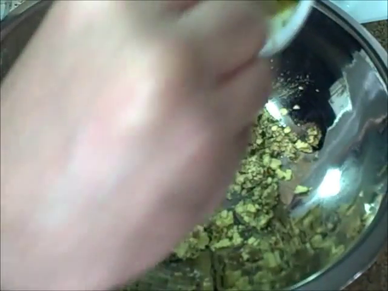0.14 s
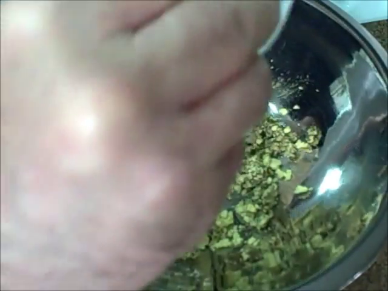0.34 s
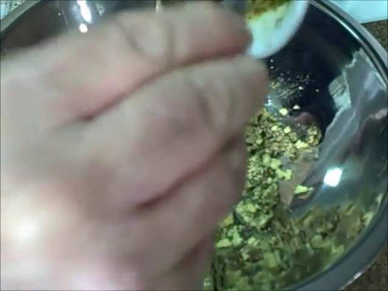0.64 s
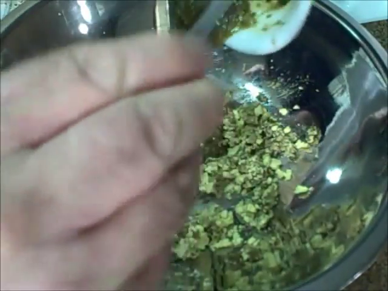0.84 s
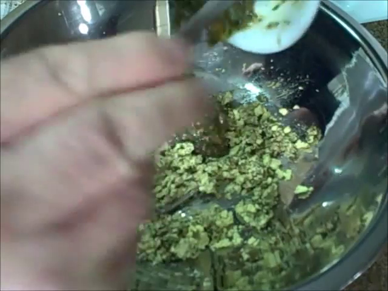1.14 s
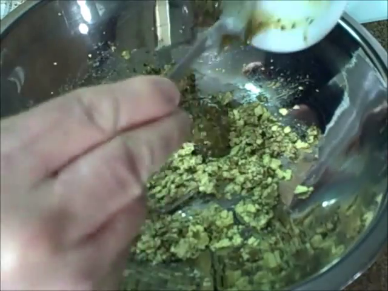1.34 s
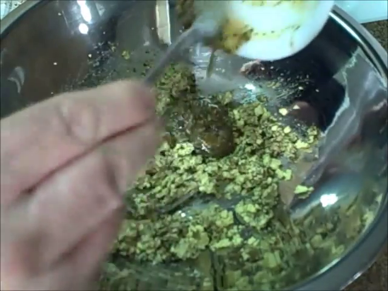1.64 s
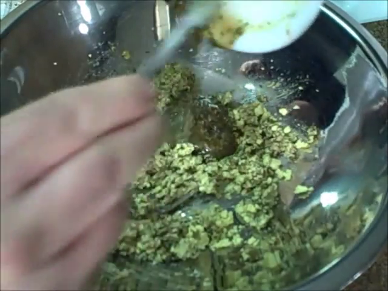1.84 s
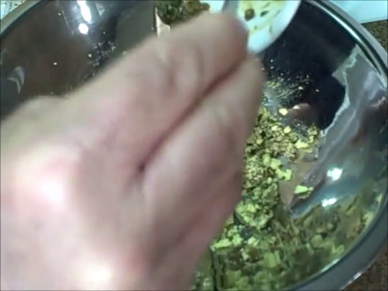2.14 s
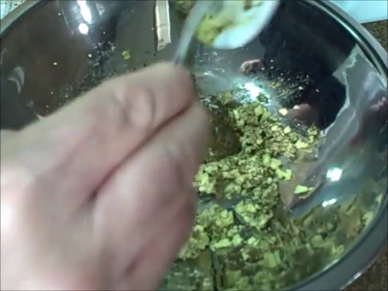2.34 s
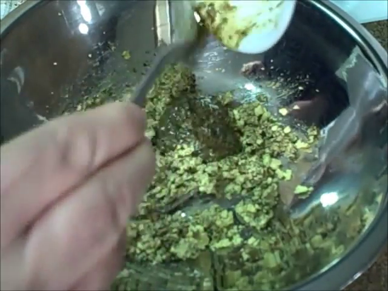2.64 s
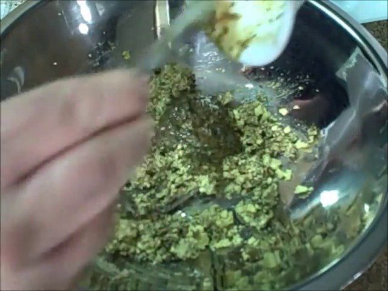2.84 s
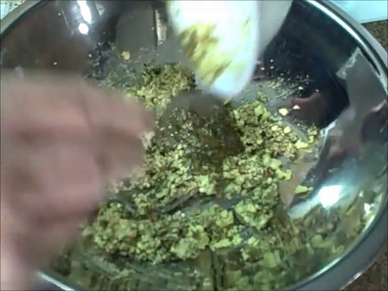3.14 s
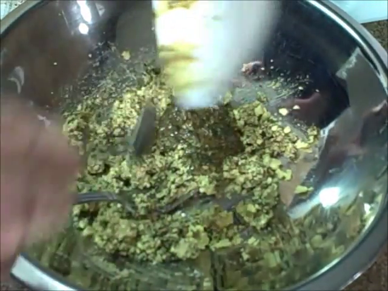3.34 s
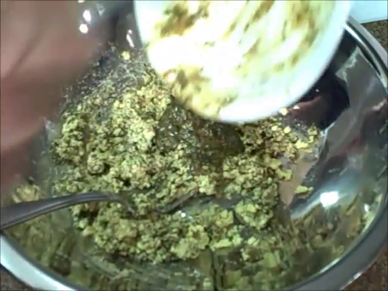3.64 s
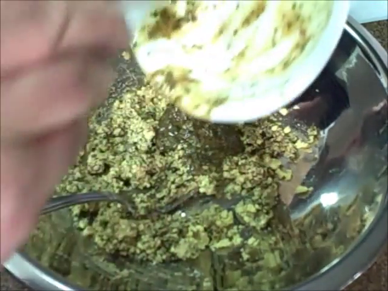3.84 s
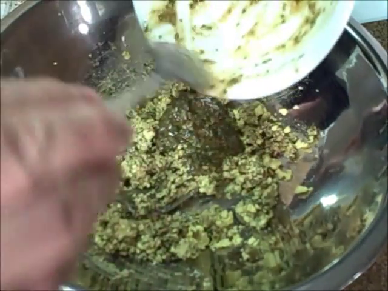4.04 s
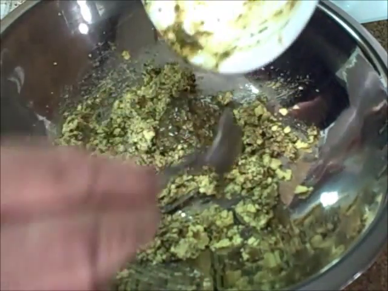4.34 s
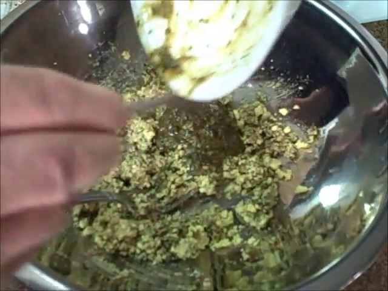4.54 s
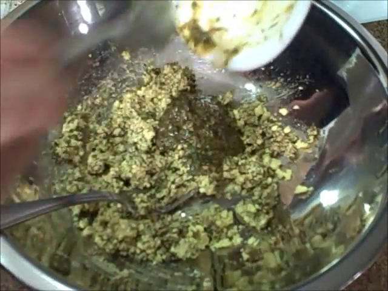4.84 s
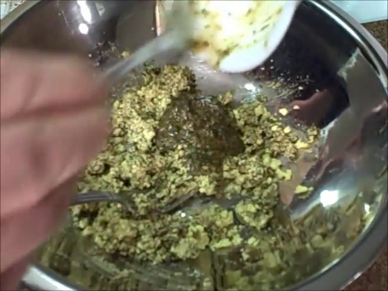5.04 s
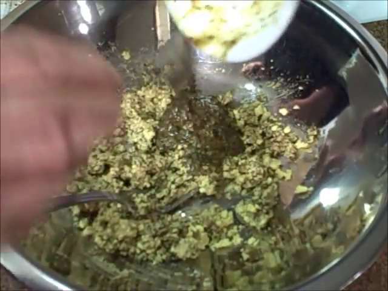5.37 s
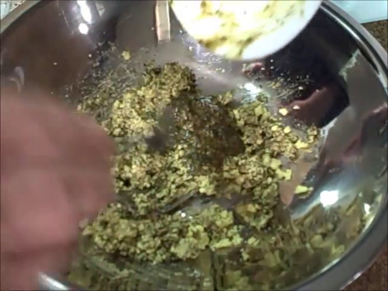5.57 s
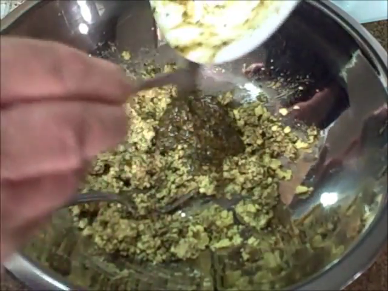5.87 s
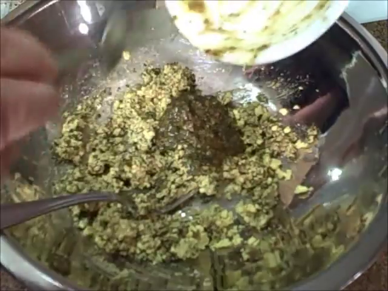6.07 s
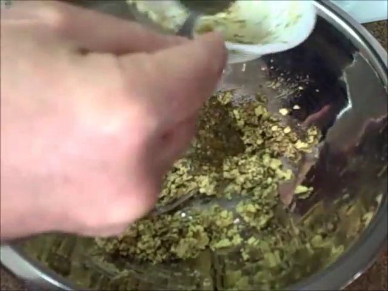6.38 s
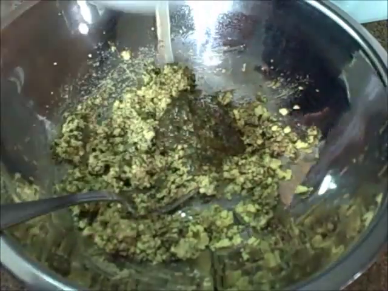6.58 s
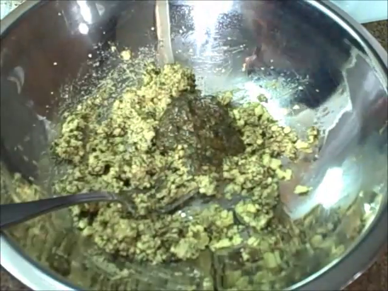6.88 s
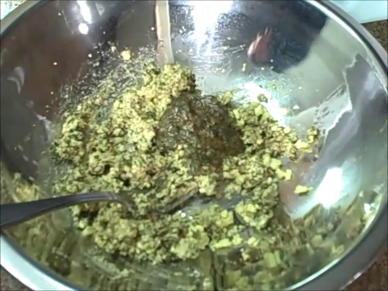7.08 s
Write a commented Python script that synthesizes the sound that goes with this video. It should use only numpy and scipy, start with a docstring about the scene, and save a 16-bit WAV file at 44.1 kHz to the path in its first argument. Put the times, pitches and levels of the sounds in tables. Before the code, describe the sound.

Close up in a small kitchen, a metal utensil cracks against a china dish two or three times a second, with a dull note from the steel bowl it rests on. The dish is lifted and its ring turns higher. Knocks continue, a little sparser, joined by a few squeaky scrapes on the glaze and tiny sticky pops of paste. An appliance hums softly under a thin hiss throughout.

```python
"""A metal utensil knocks and scrapes soft paste out of a small china dish over a steel mixing bowl.
An appliance hums under a faint hiss. At first the dish leans on the bowl and rings lower: each knock is
a hard crack, the modes of the dish and a dull note of the bowl, answered by a small kitchen.
Lifted before 3 s, the dish rings on a higher note; near 4 s it touches the bowl again, more lightly.
Knocks, squeaky scrapes and wet ticks go on to the end; the loudest knocks overload the close microphone."""
import sys
import numpy as np
from scipy import signal
from scipy.fft import rfft, irfft
from scipy.io import wavfile
from scipy.ndimage import uniform_filter1d

SR = 44100
rng = np.random.default_rng(int(sys.argv[2]) if len(sys.argv) > 2 else 0)


def output_pcm(signal):
    """Save a mono or channel-first signal as 16-bit PCM at the path in sys.argv[1].

    Samples are clipped to [-1, 1] before scaling.
    """
    pcm = np.clip(np.atleast_2d(signal).T, -1, 1) * 32767
    wavfile.write(sys.argv[1], SR, np.round(pcm).astype(np.int16))


N = 317961

# lines of the appliance hum: f/Hz, rms level/dB, relative depth of fluctuation
HUM_LINES = [(58.5, -58.5, .15), (110.2, -58.5, .7), (116.2, -57, 1.6), (127, -59, 1), (219, -62.5, 1.2),
             (352, -70, 0.46), (490, -77, 0.37)]
# spectrum of the low room noise: f/Hz, relative level/dB
RUMBLE_SPECTRUM = [(20, -3), (45, -5.5), (80, -12.5), (105, -4.5), (130, 0.5), (170, -10.5), (260, -13),
                   (400, -19), (700, -24), (1500, -31), (4000, -44), (16000, -59.5)]
# spectrum of the hiss: f/Hz, relative level/dB
HISS_SPECTRUM = [(100, 2), (700, -4), (1500, -1), (3000, -1.5), (6000, -3.5), (10000, -4), (16000, -5)]
# envelope of the hiss: t/s, relative level/dB
HISS_ENVELOPE = [(0.0, -62.5), (0.78, -68), (0.96, -58.5), (1.1, -67), (1.46, -61.5), (2.71, -65.5),
                 (3.17, -64.5), (3.71, -65.5), (3.91, -64.5), (4.09, -66.5), (4.75, -64.5), (5.81, -67.5),
                 (6.08, -62), (6.62, -61.5), (6.78, -59.5), (7.2, -58.5)]
# reverberation time of the kitchen: f/Hz, T60/s
ROOM_DECAY = [(200, 0.28), (900, 0.43), (2200, .45), (3600, 0.46), (6500, 0.39), (11000, 0.23),
              (16000, 0.3)]
# wet ticks of the paste: t/s, level/dB
PASTE_TICKS = [(0.0823, -45), (1.141, -40), (1.684, -47), (2.528, -42), (2.565, -43), (2.704, -46.5),
               (4.051, -45), (5.516, -33), (5.859, -39), (6.358, -26)]
# modes of dish and bowl: f/Hz, level when free/dB, level when leaning/dB, unscaled T60/s
MODES = [(845, -20.5, -22.5, 0.09), (936, -28.5, -6, .07), (1100, -27.5, -14, 0.051),
         (1480, -26, -21.5, 0.17), (2160, -0.5, -12.5, 0.11), (2780, -16, -16, .05), (3170, -23, -16, .05),
         (3575, -7, 3, .14), (3958, 2, -13, .13), (4260, -21, -18, .05), (4918, -14.5, -24, .09),
         (5530, -20.5, -14, .07), (6058, -4.5, -15.5, .08), (6160, -9.5, -18, 0.13),
         (6404, -10, -3.5, 0.07), (6750, -15, -15, 0.034), (6990, -24.5, -2.5, 0.084),
         (8140, -26, -4.5, .04), (8600, -11.5, -11.5, 0.045), (8665, 2, -21.5, 0.089),
         (9240, -26.5, -15.5, 0.12), (10900, -29.5, -10.5, 0.12), (10270, -13, -1, 0.046),
         (10890, -11.5, -15, 0.02), (12020, -7.5, -19.5, 0.04), (11170, -10.5, -13.5, 0.14),
         (12870, -23.5, -7, 0.047), (13980, -5.5, -12.5, .05), (13940, -20, -13, .05),
         (15400, -7.5, -13.5, 0.082)]
# spectrum of the crack of metal on china: f/Hz, relative level/dB
CRACK_SPECTRUM = [(100, -15.5), (300, -1.5), (560, -19.5), (950, 1.5), (1400, -3), (2200, 11.5), (3600, 5),
                  (5000, -7), (6600, 4.5), (9500, -3.5), (13000, 1), (16000, -8.5)]
# strokes along the glaze: t/s, duration/s, peak level/dB, squeak's first f/Hz, squeak's last f/Hz
SCRAPES = [(-.05, 0.098, -54.5, 3300, 3060), (.231, 0.026, -52, 1100, 920),
           (0.527, 0.021, -49.5, 1028, 815), (3.232, 0.064, -28.5, 2900, 2580),
           (3.285, 0.074, -47, 2700, 2595), (3.376, 0.036, -34, 2690, 2335),
           (4.534, 0.097, -29, 2660, 3120), (4.603, 0.13, -40.5, 2800, 2225),
           (5.972, 0.09, -45.5, 2800, 2660)]
# contact of dish and bowl: t/s, firmness (0 free, 1 leaning)
LEAN = [(0, 0.95), (2.3, 1), (2.8, 0.24), (3.4, 0.16), (3.87, 0.59), (4.2, 0.42)]
# bands of a knock: lower f/Hz, upper f/Hz, level when free/dB, level when leaning/dB
# (rows: thud of the bowl, low clank, lower dish note, upper dish note, clang, sizzle)
KNOCK_BANDS = [(200, 1406, -22, -18), (1620, 3010, -13, -16.5), (3243, 3732, -22, -8.5),
               (3803, 4285, -7.5, -15), (4650, 9200, -5.5, -5), (8520, 17000, -8.5, -6)]
# blows of the utensil: t/s, level/dB, extra thud from the hand's weight/dB,
# tilt towards the upper dish note/dB, f/Hz favoured by the struck spot
KNOCKS = [(0.1309, -57.5, 20.5, 8, 6400), (0.2277, -39.5, 11, 0, 6000), (.5304, -50, 18, 2, 6400),
          (0.7391, -10, -3, 2, 6780), (0.804, -14, 1, 4, 6000), (0.9939, -45, 22, 2, 6020),
          (1.0611, -14.5, -1.5, -5, 6960), (1.2829, -10, 1.5, -6, 6460), (1.36, -28.5, -4.5, -1, 6430),
          (1.5594, -5.5, -1, 0, 6370), (1.6089, -25, -9, -0.5, 6450), (1.8362, -9.5, 1, 4, 6160),
          (1.904, -29.5, 0.5, -3, 10440), (2.2284, -6.5, -1, 3, 6660), (2.8961, -10.5, 3, 4, 6360),
          (3.2224, -16, -9, -0.5, 6350), (3.301, -25.5, 2, 1.5, 8715), (3.8656, -7.5, 6, -13.5, 6440),
          (4.243, -22.5, 1, -4, 5930), (4.5105, -5.5, -6.5, 3, 5920), (4.5958, -10, -8.5, -3, 6430),
          (4.6923, -17, -3.5, -9, 6030), (5.0532, -7.5, 2.5, -6, 8510), (5.1618, -36, 3.5, -16, 5960),
          (5.4134, -7.5, 3, 5.5, 2140), (5.9138, -12.5, -5, 6.5, 5970), (6.0352, -32.5, 0.5, 7.5, 6200),
          (6.5851, -16, -3.5, 7.5, 8750), (6.6006, -22.5, 1.5, 4, 8685), (6.9068, -9, 2, 3.5, 2140)]


def gain_of(db):
    """Amplitude ratio of a level in decibels."""
    return 10 ** (np.asarray(db) / 20)


def unit_rms(x):
    """Normalisation to rms 1."""
    return x / np.sqrt(np.mean(x ** 2) + 1e-20)


def decay(t, t60):
    """Exponential damping: the amplitude falls 60 dB in t60 seconds."""
    return np.exp(-np.log(1000) * t / t60)


def value_at(points, hz):
    """Interpolation on a logarithmic frequency axis."""
    f, value = np.transpose(points)
    return np.interp(np.log(hz + 1), np.log(f + 1), value)


def add(mix, onset_s, sound):
    """Superposition of a sound on the mix from its onset."""
    start = round(onset_s * SR)
    sound = sound[max(-start, 0):]
    part = mix[max(start, 0):][:len(sound)]
    part += sound[:len(part)]


def noise(spectrum, size):
    """Spectral shaping of white noise, at rms 1."""
    gains = gain_of(value_at(spectrum, np.fft.rfftfreq(size, 1 / SR)))
    return unit_rms(irfft(rfft(rng.standard_normal(size)) * gains, size))


def drift(rate_hz):
    """Slow random fluctuation: low-passed noise of rms 1."""
    lowpass = np.exp(-(np.fft.rfftfreq(N, 1 / SR) / rate_hz) ** 2)
    return unit_rms(irfft(rfft(rng.standard_normal(N)) * lowpass, N))


def band(x, low_hz, high_hz):
    """Causal band-pass filtering."""
    return signal.sosfilt(signal.butter(3, [low_hz, high_hz], "band", fs=SR, output="sos"), x)


def background(rumble_db=-52.0, waver_hz=22.0, hiss_lift_db=2.5):
    """Random modulation broadens the appliance's hum lines, over low room noise and a thin hiss."""
    t = np.arange(N) / SR
    hum = np.zeros(N)
    for hz, db, depth in HUM_LINES:
        modulation = 1 + depth * (drift(waver_hz) + 1j * drift(waver_hz))
        carrier = np.exp(2j * np.pi * (hz * t + rng.random()))
        hum += gain_of(db) * unit_rms((modulation * carrier).real)
    hiss_db = hiss_lift_db + np.interp(t, *np.transpose(HISS_ENVELOPE))
    hiss = gain_of(hiss_db) * noise(HISS_SPECTRUM, N)
    return hum + gain_of(rumble_db) * noise(RUMBLE_SPECTRUM, N) + hiss


def kitchen(direct, reverb_db=-18.5, build_s=0.0037, reflections_per_s=4000):
    """Reverberation: dense reflections of random sign follow the sound, each band at its own decay rate."""
    size = SR * 3 // 4
    reflections = rng.choice([-1., 1.], size) * (rng.random(size) < reflections_per_s / SR)
    hz, t, spectra = signal.stft(reflections, SR, nperseg=256)
    tail = signal.istft(spectra * decay(t, value_at(ROOM_DECAY, hz)[:, None]), SR)[1]
    tail *= 1 - np.exp(-(np.arange(len(tail)) / SR / build_s) ** 2)
    return direct + gain_of(reverb_db) * signal.fftconvolve(direct, tail / np.linalg.norm(tail))[:N]


def paste(fade_s=0.0013):
    """Adhesion fails: the paste lets go in small sticky pops, each a damped burst of noise."""
    out, t = np.zeros(N), np.arange(SR // 64) / SR
    for onset, db in PASTE_TICKS:
        pop = band(rng.standard_normal(len(t)), 1400, 15500) * np.exp(-t / fade_s)
        add(out, onset, gain_of(db) * pop)
    return out


def bowl_afterring(hz=3520, db=-40.5, t60=0.8):
    """Free vibration of one lightly damped mode: the steel bowl sings on faintly."""
    t = np.arange(SR) / SR
    return gain_of(db) * decay(t, t60) * np.sin(2 * np.pi * hz * t)


def dish_ring(t, t60_scale, lean, shift_hz, favoured_hz, favour_db=7.5, scatter_db=-1.5, detune_hz=4.0):
    """Modal superposition: contact with the bowl and the struck spot weight the damped modes."""
    hz, free_db, leaning_db, t60 = np.transpose(MODES)[:, :, None]
    scatter, detune, phase = rng.standard_normal((3, len(hz), 1))
    hz = hz + shift_hz + detune_hz * detune
    db = free_db + lean * (leaning_db - free_db) + scatter_db * scatter
    db += favour_db * np.exp(-((hz - favoured_hz) / 120) ** 2)
    return (gain_of(db) * decay(t, t60 * t60_scale) * np.sin(2 * np.pi * (hz * t + phase))).sum(0)


def scrapes(slips_per_s=3000, jitter=0.045, grit_db=-2.0, squeak_db=-0.5, grit_s=0.0004):
    """Stick-slip friction on the glaze: tiny blows excite the damped dish under a rough, gliding squeak."""
    out, impulse_t = np.zeros(N), np.arange(SR // 16) / SR
    for onset, duration, db, from_hz, to_hz in SCRAPES:
        t = np.arange(0, duration, 1 / SR)
        size = len(t)
        slips = rng.standard_normal(size) * (rng.random(size) < slips_per_s / SR)
        damped_ring = dish_ring(impulse_t, t60_scale=0.065, lean=0.17, shift_hz=0, favoured_hz=6400)
        body = unit_rms(signal.fftconvolve(slips, damped_ring)[:size])
        click = noise(CRACK_SPECTRUM, len(impulse_t)) * np.exp(-impulse_t / grit_s)
        grit = unit_rms(band(signal.fftconvolve(slips, click)[:size], 1500, 7300))
        wobble = unit_rms(uniform_filter1d(rng.standard_normal(size), size=40))
        squeak_hz = np.linspace(from_hz, to_hz, size) * (1 + jitter * wobble)
        squeak = np.sin(2 * np.pi * np.cumsum(squeak_hz) / SR)
        pressure = np.interp(t / duration, [0, 0.79, 1], [0.19, 1, 0.15])  # builds, then lets go
        friction = unit_rms(body + gain_of(grit_db) * grit + gain_of(squeak_db) * squeak)
        add(out, onset, gain_of(db) * pressure * friction)
    return out


def impact(lean, favoured_hz, ring_db=-4.5, chatter_db=-0.3, crack_db=-4.5, lean_crack_db=5.5):
    """Impact excitation: metal cracks and chatters on china, pinching the modes; then they ring free."""
    t = np.arange(SR // 4) / SR
    t60_scale = np.interp(lean, [0, 1], [0.72, 0.86])
    shift_hz = -48 * lean ** 3  # firm leaning flattens the ring
    contact = decay(t, 0.032 * t60_scale)
    crack = unit_rms(noise(CRACK_SPECTRUM, len(t)) * contact)
    force = rng.standard_normal(len(t)) * contact
    pinched_ring = dish_ring(t, t60_scale=0.31, lean=lean, shift_hz=shift_hz, favoured_hz=favoured_hz)
    chatter = unit_rms(signal.fftconvolve(force, pinched_ring)[:len(t)])
    ring = unit_rms(dish_ring(t, t60_scale, lean, shift_hz, favoured_hz))
    vibration = gain_of(ring_db) * ring + gain_of(chatter_db) * chatter
    return vibration + gain_of(crack_db + lean_crack_db * lean) * crack


def band_levels(lean, thud_db, tilt_db, favoured_hz, spot_db=2.5, clank_share=0.59):
    """Coupling to the bowl colours a knock; weight adds thud, and the spot tilts the two dish notes."""
    low_hz, high_hz, free_db, leaning_db = np.transpose(KNOCK_BANDS)
    db = free_db + lean * (leaning_db - free_db)
    db += spot_db * ((low_hz <= favoured_hz) & (favoured_hz < high_hz))
    db += np.array([thud_db, clank_share * thud_db, -tilt_db, tilt_db, 0, 0])
    return zip(low_hz, high_hz, db)


def knocks(attack_s=0.02):
    """Transient response: each impact sounds in six bands and, through the contact, rings the bowl."""
    out, attack = np.zeros(N), round(attack_s * SR)
    for onset, strength_db, thud_db, tilt_db, favoured_hz in KNOCKS:
        lean = np.interp(onset, *np.transpose(LEAN))
        blow = impact(lean, favoured_hz)
        for low_hz, high_hz, db in band_levels(lean, thud_db, tilt_db, favoured_hz):
            part = band(blow, low_hz, high_hz)
            add(out, onset, gain_of(strength_db + db) * part / np.std(part[:attack]))
        add(out, onset, gain_of(strength_db) * lean ** 3 * bowl_afterring())
    return out


def scene():
    """Superposition: knocks, scrapes and paste reverberate in the kitchen, over the background."""
    return (kitchen(knocks() + scrapes() + paste()) + background())[None]


def record(dry, ceiling=0.86, cutoff_hz=15900):
    """Saturation: the microphone overloads with a firm knee, and a low-pass limits the bandwidth."""
    clipped = dry / (1 + (dry / ceiling) ** 6) ** (1 / 6)
    lowpass = signal.firwin(255, cutoff_hz, window=("kaiser", 7), fs=SR)
    return signal.oaconvolve(clipped, lowpass[None], "same")


dry = scene()
out = record(dry)
output_pcm(out)
```